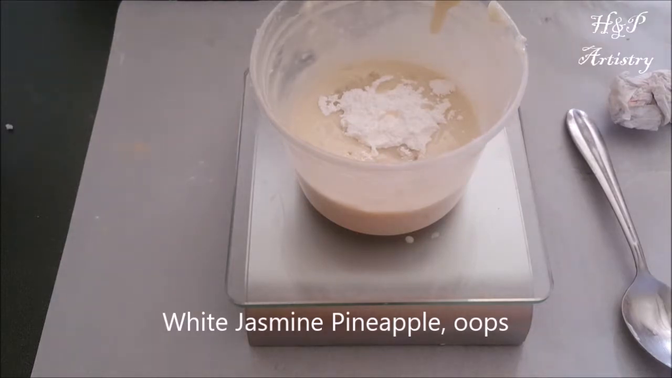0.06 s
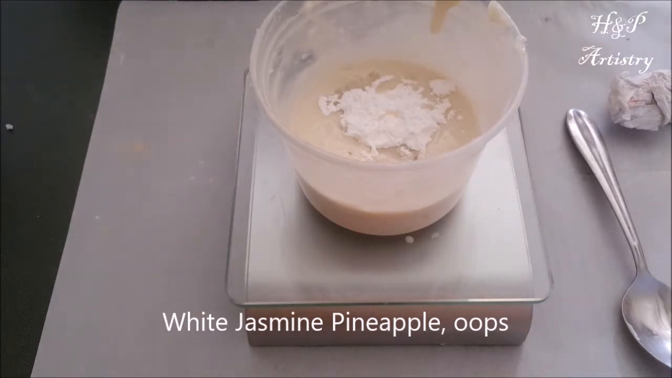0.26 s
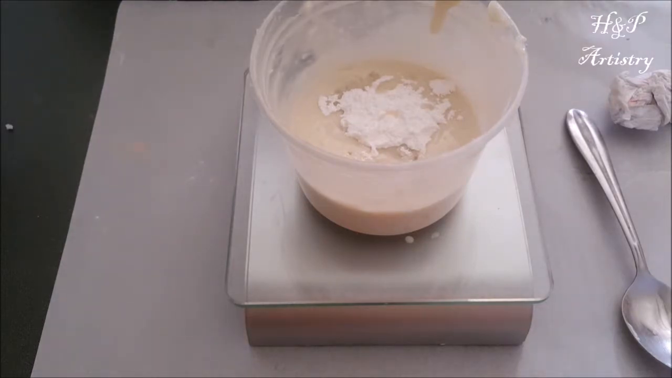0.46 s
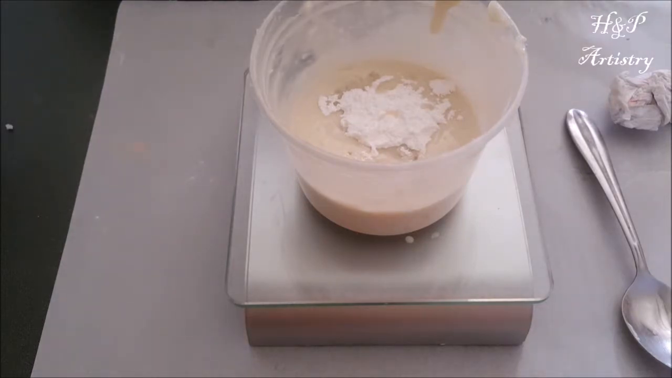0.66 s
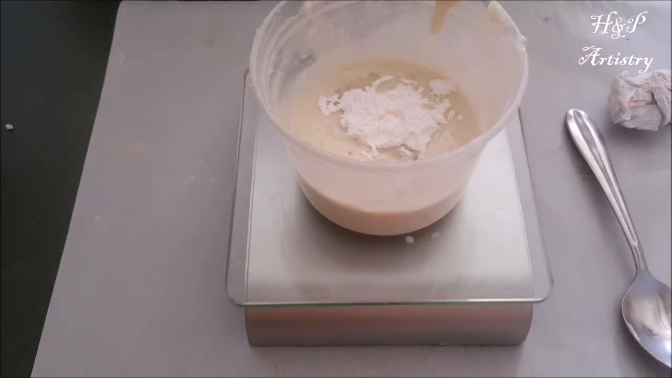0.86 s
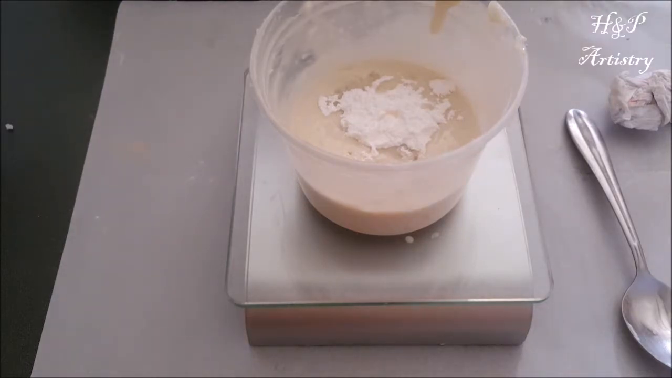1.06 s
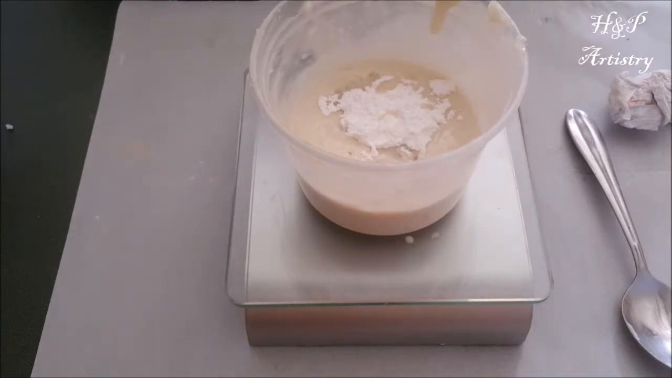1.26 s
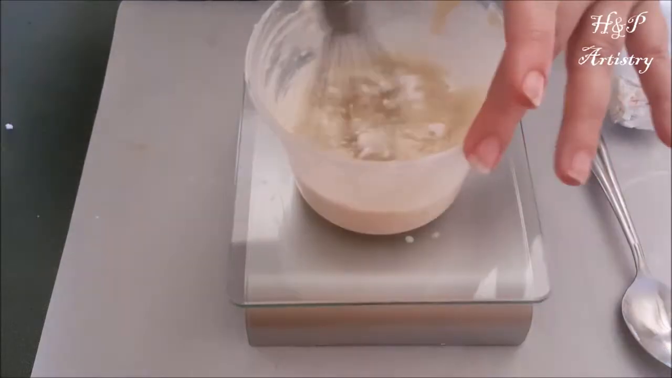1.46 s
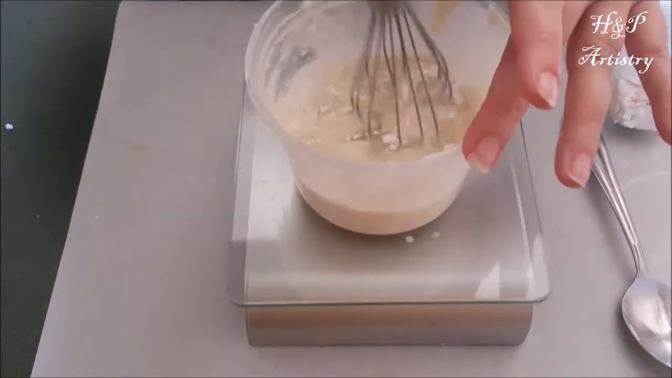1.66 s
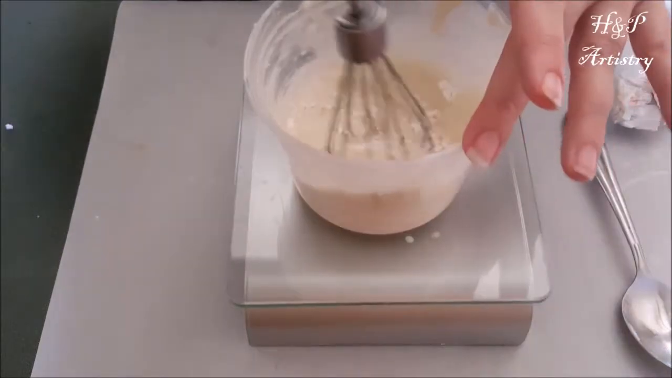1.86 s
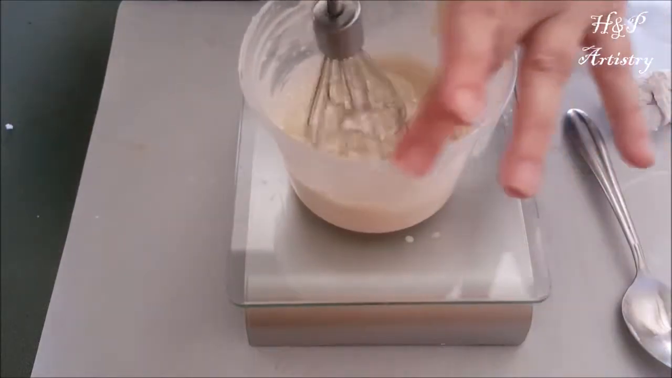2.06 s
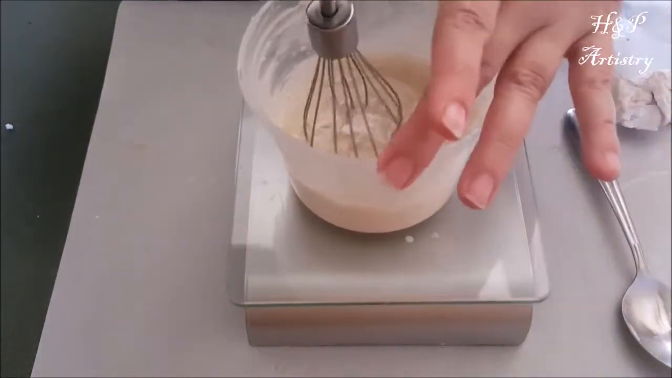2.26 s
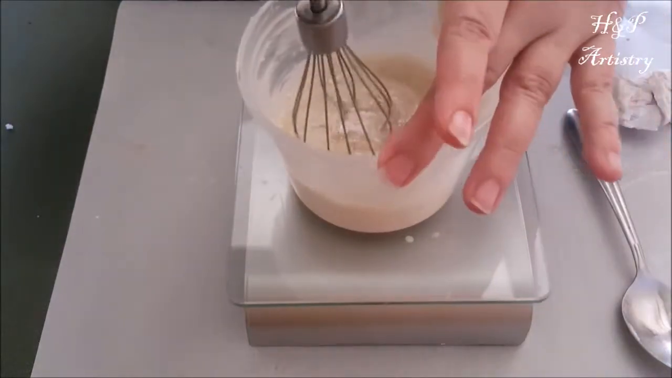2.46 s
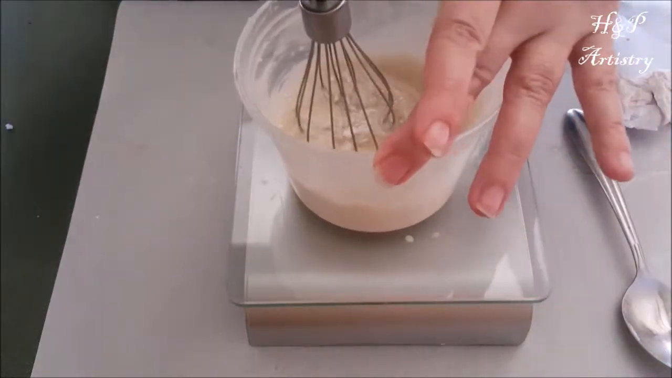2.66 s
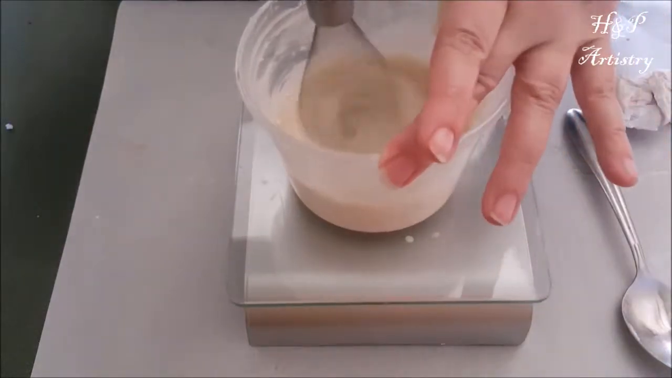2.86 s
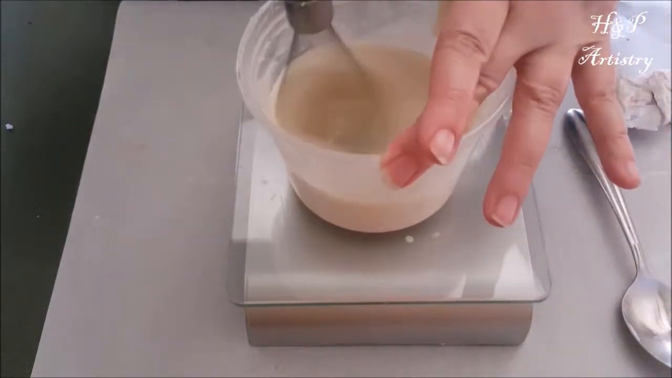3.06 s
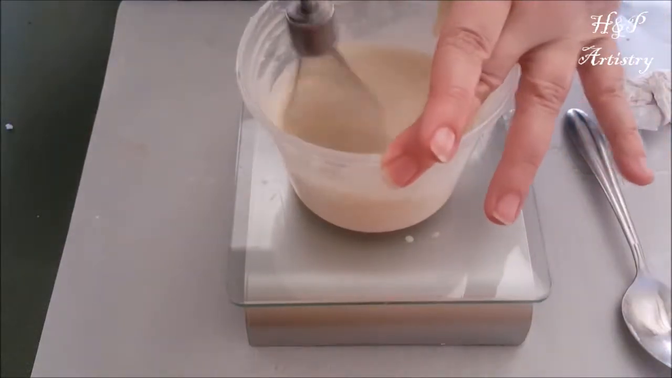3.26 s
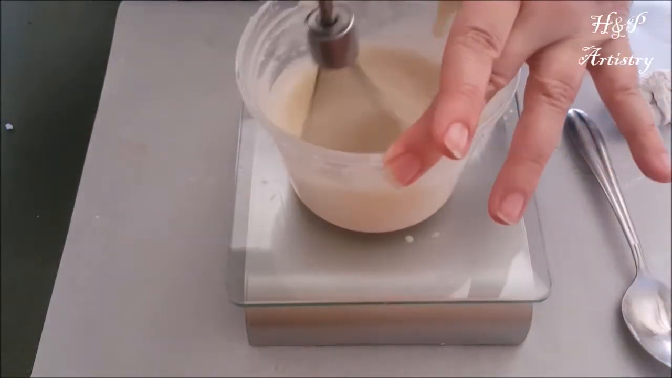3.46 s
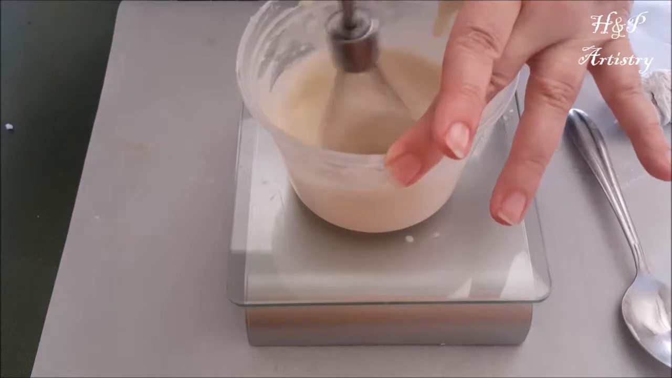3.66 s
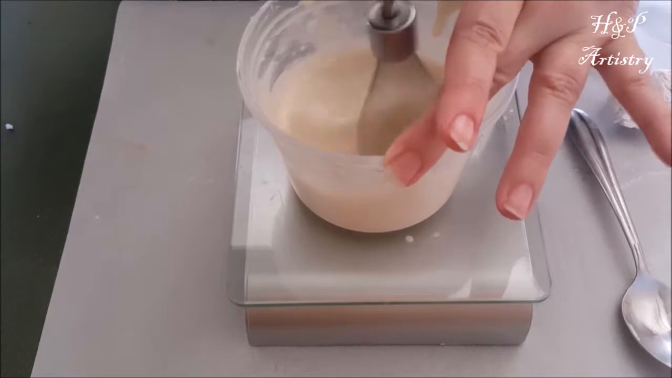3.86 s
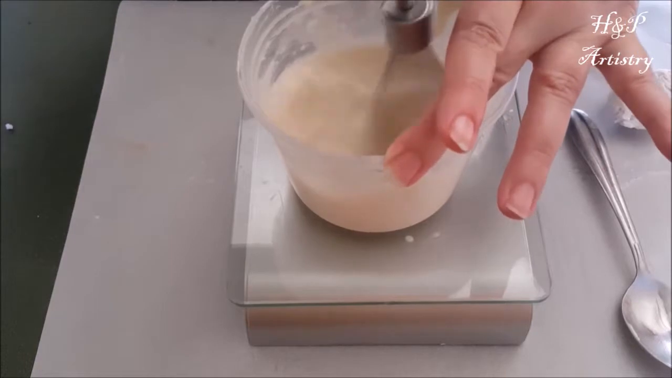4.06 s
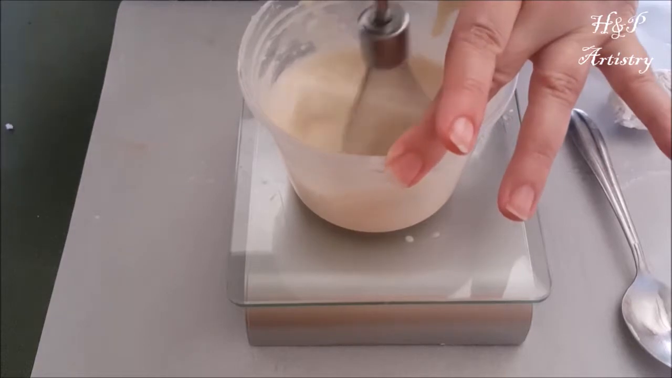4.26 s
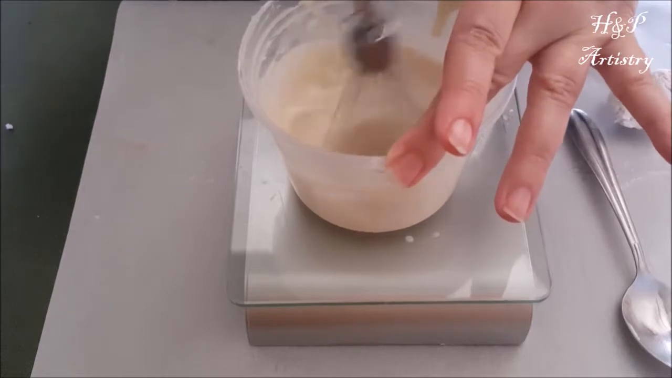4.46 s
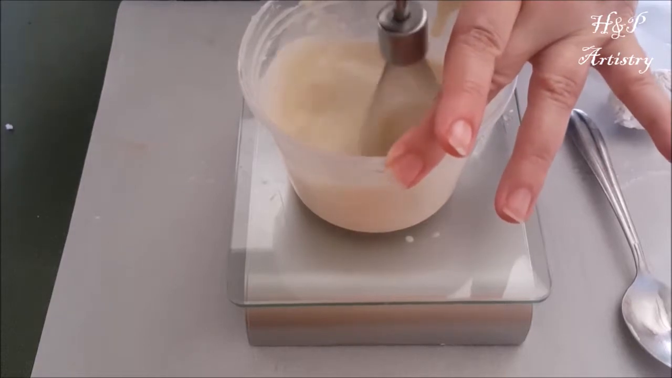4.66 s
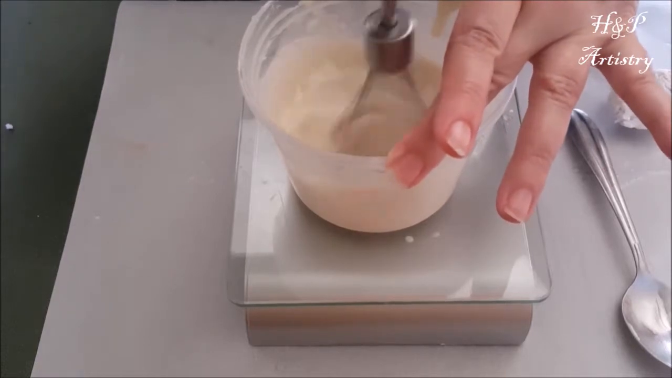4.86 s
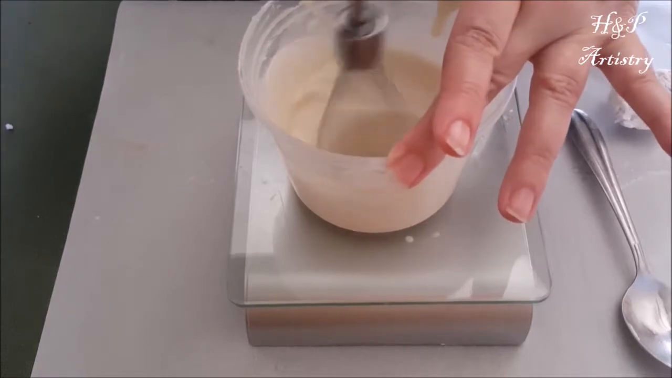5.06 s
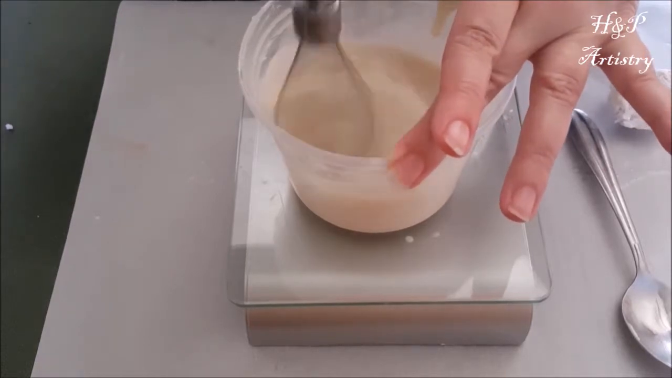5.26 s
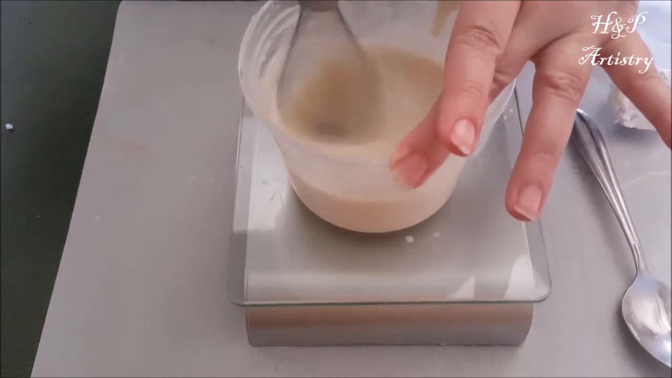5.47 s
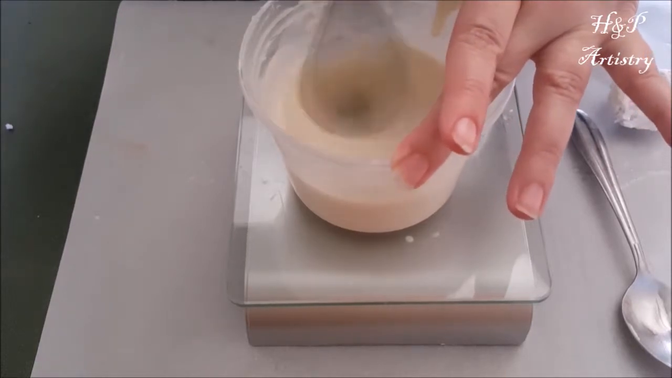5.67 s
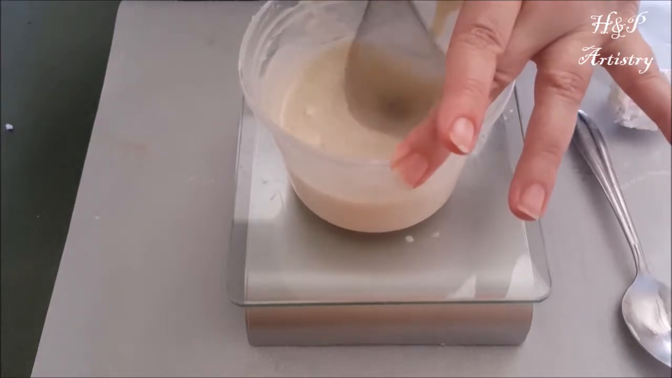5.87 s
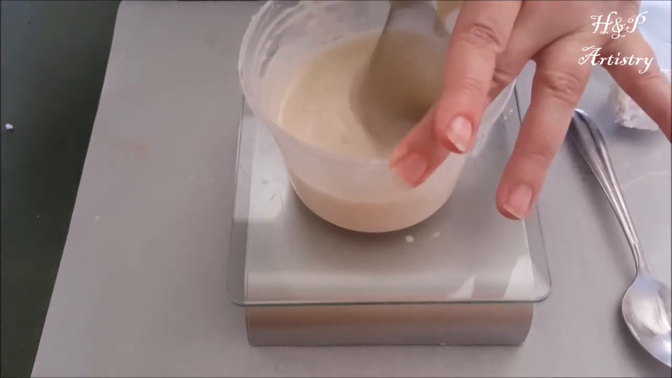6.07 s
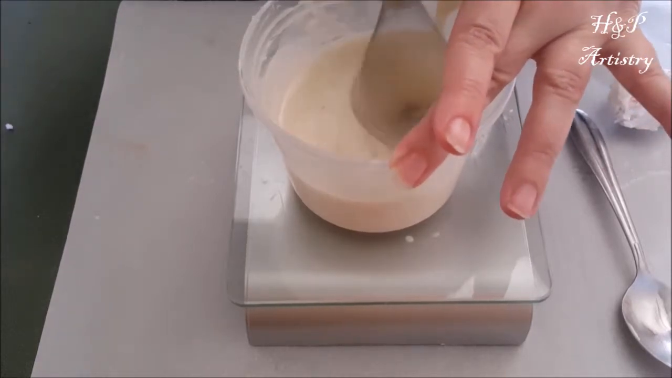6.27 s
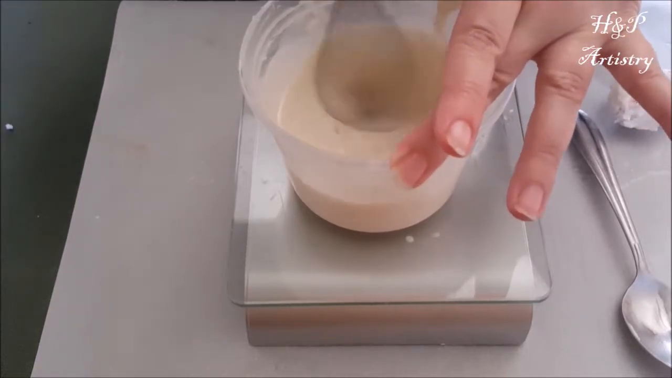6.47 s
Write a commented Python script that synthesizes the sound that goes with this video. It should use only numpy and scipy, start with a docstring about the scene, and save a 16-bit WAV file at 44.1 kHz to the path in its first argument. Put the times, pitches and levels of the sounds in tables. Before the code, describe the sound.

Close stereo microphones pick up the faint hum of a small kitchen, then hollow knocks and wiry ticks as a whisk is lowered into a plastic cup of creamy liquid. A stick blender switches on with a jolt and runs up to speed. Its motor keeps whining, buzzing and hissing over the frothy churn of the liquid, the pitch sagging slightly as the whisk dips deeper.

```python
"""Stick blender in a cup of cream

A small, quiet kitchen with a faint mains hum; a stereo pair close to a plastic cup on a kitchen scale.
A wire whisk is lowered into the creamy liquid, knocking and sliding against the cup. The motor jerks
into motion and runs up: the shaft hums, the gears whine and rattle in the housing, the brushes hiss
and the whisk churns the liquid, whose drag slows the shaft a little as the hand dips deeper."""
import sys
import numpy as np
from scipy import signal
from scipy.fft import rfft, irfft, next_fast_len
from scipy.io import wavfile
from scipy.ndimage import map_coordinates

SR = 44100
rng = np.random.default_rng(int(sys.argv[2]) if len(sys.argv) > 2 else 0)


def wav_out(sig):
    """Save sig, one row per channel (or a flat mono array), as 16-bit PCM at SR to the path in sys.argv[1]."""
    wavfile.write(sys.argv[1], SR, np.round(np.clip(np.atleast_2d(sig).T, -1, 1) * 32767).astype(np.int16))


N = 287267
TIME = np.arange(N) / SR
START_S = 2.78  # switch-on
FREE_HZ, FULL_HZ = 280.2, 270  # shaft turns a second: whisk held high, full working speed


def amp(db):
    """Decibels to gain."""
    return 10 ** (np.asarray(db) / 20)


def unit(x):
    """Scale to rms 1."""
    return x / np.sqrt(np.mean(x ** 2) + 1e-20)


def along(points, hz):
    """Read (f/Hz, value) points on a log frequency axis."""
    f, values = np.transpose(points)
    return np.interp(np.log(hz + 1), np.log(f + 1), values)


def wobble(rate):
    """A smooth random curve, rate knots a second."""
    return map_coordinates(rng.standard_normal(int(N * rate / SR) + 4), [TIME * rate])


def filtered(x, response):
    """Apply a frequency response to x."""
    size = next_fast_len(N + SR // 4)
    return irfft(rfft(x, size) * response(np.fft.rfftfreq(size, 1 / SR)), size)[..., :N]


def after(s, rise_s=0.0039):
    """A gate that opens at s seconds."""
    return np.clip((TIME - s) / rise_s, 0, 1)


def add(track, s, sound):
    """Mix a sound into a track at s seconds."""
    part = track[round(s * SR):][:len(sound)]
    part += sound[:len(part)]


def spread(pair, spectrum):
    """Colour two unrelated signals and blend them for the two microphones; the mid has rms 1."""
    # likeness of left and right: f/Hz, correlation/0-1
    likeness = [(60, 0.77), (130, 1), (290, 0.89), (640, 0.92), (1410, 0.57), (3100, 0.85), (6820, 0.4),
                (15000, 0.074)]

    def response(hz):
        angle = np.arccos(np.clip(along(likeness, hz), 0, 1)) / 2
        return amp(along(spectrum, hz)) * np.array([np.cos(angle), np.sin(angle)])

    mid, side = filtered(pair, response)
    return np.array([mid + side, mid - side]) / np.std(mid)


def rush(spectrum):
    """Stereo noise with a spectrum of f/Hz, relative level/dB."""
    return spread(rng.standard_normal((2, N)), spectrum)


def tone(turns, multiple, rough, flutter_db):
    """One line of the rotating parts, unsteady in phase (rough, radians) and in strength."""
    flutter = amp(flutter_db * wobble(14))
    return np.sqrt(2) * flutter * np.sin(2 * np.pi * multiple * turns + rough * wobble(45))


def ring(modes, t, scatter_db):
    """Damped modes struck softly with random strengths, at rms 1 over the first 15 ms."""
    hz, db, t60 = np.transpose(modes)[:, :, None]
    swing = np.sin(2 * np.pi * hz * t) * (-1) ** np.arange(len(hz))[:, None]
    decay = amp(db + scatter_db * rng.standard_normal(db.shape) - 60 * t / t60)
    attack = 1 - np.exp(-(t / 0.00077) ** 2)
    sound = attack * (decay * swing).sum(0)
    return sound / np.std(sound[t < .015])


def room_tone():
    """Still air all round the microphones and the mains hum of an appliance in the centre."""
    # room air: f/Hz, relative level/dB
    air = [(20, -32), (40, -23), (68, -6), (95, -19), (170, -16.5), (320, -24), (470, -23.5), (800, -31),
           (1200, -27.5), (1700, -21.5), (2600, -28.5), (4200, -39.5), (9000, -42.5), (15800, -39)]
    mains = np.sin(2 * np.pi * 120 * TIME)
    return amp(-68.5) * rush(air) + amp(-66.5 + 0.72 * wobble(5.3)) * mains


def knocks(hollow_hz=590, hollow_t60=0.11):
    """The whisk hits the cup wall with a tick of its wires; blows on the bottom thud through the scale."""
    # whisk on the cup: t/s, thud/dB, wall/dB, relative tick level/dB, hardness/dB per octave
    blows = [(1.507, -34, -38, -52.5, 2.5), (1.791, -38.5, -35.5, -53, 3.2),
             (2.05, -31.5, -31.5, -45.5, -1.5), (2.124, -68, -61, -53.5, 1.5), (2.14, -47, -43, -62, -1),
             (2.171, -54, -55, -76, -3), (2.308, -77, -49, -54, -10), (2.508, -58, -45.5, -60, 2.5),
             (2.534, -52, -43, -50, -5), (2.65, -64, -68, -80, -2), (2.676, -58, -52, -60, -1),
             (2.724, -69, -52, -62, 2)]
    # modes of the cup wall: f/Hz, relative level/dB, t60/s
    wall_modes = [(560, -16, .07), (543, 3, 0.032), (675, -1, 0.028), (964, -6, 0.04), (1203, -2.5, 0.018),
                  (1612, -8.5, 0.027), (2220, -10, 0.015), (2900, -14, 0.011)]
    # modes of the scale under the cup: f/Hz, relative level/dB, t60/s
    scale_modes = [(85, -26, 0.2), (142, -14, 0.12), (275, -1.5, 0.044), (395, 4, 0.031)]
    body, ticks, t = np.zeros(N), np.zeros(N), np.arange(SR // 4) / SR
    for s, thud_db, wall_db, tick_db, tilt_db in blows:
        tilted = [(hz, db + tilt_db * np.log2(hz / wall_modes[0][0]), t60) for hz, db, t60 in wall_modes]
        stretch = 1 + 0.041 * rng.standard_normal()  # the ring depends on where the wires land
        thud = ring(scale_modes, t, scatter_db=1)
        wall = ring(tilted, t * stretch, scatter_db=1.5)
        # the hollow note of the filled cup is most exposed after light taps
        hollow = amp(-28 + 0.4 * wall_db - 60 * t / hollow_t60) * np.sin(2 * np.pi * hollow_hz * t)
        add(body, s + 0.00258, amp(thud_db) * thud + amp(wall_db) * wall + hollow)
        tick_shape = amp(tick_db + 12.5 - 60 * t / 0.024) * (1 - np.exp(-t / 0.0033))
        add(ticks, s + 0.00224, tick_shape * rng.standard_normal(len(t)))
    # colour of the wire ticks: f/Hz, gain/dB
    wires = [(80, -10), (300, -3), (2000, 13.5), (4500, 3.5), (9000, -9.5), (15000, -12)]
    return body + filtered(ticks, lambda hz: amp(along(wires, hz)))


def kitchen(x, delay_s=.005):
    """The short reverberation of nearby walls, different at each microphone."""
    # decay of the room: f/Hz, t60/s
    decay = [(150, 0.11), (600, 0.33), (3000, 0.31), (12000, 0.43)]
    hz, t, noise = signal.stft(rng.standard_normal((2, SR // 2)), SR, nperseg=256)
    tail = signal.istft(noise * amp(-60 * t / along(decay, hz)[:, None]), SR, nperseg=256)[1]
    delayed = np.pad(x, (round(delay_s * SR), 0))
    return signal.fftconvolve(delayed[None], tail / np.linalg.norm(tail[0]), axes=1)[:, :N]


def scrape(fade_db_per_s=42):
    """The wires slide faintly along the wet wall of the cup; each slide rises, holds and fades."""
    # wires sliding on the cup: t/s, length/s, level/dB
    slides = [(2.06, 0.27, -62), (2.67, 0.12, -67)]
    level = sum(after(s, rise_s=.02) * amp(db - fade_db_per_s * np.maximum(TIME - s - length, 0))
                for s, length, db in slides)
    hiss = rush([(300, 9), (2500, 4), (5000, -8), (7000, -8), (8700, -4), (10000, -13), (15000, -11)])
    return level * amp(1.9 * wobble(63)) * hiss * (1 - after(START_S))


def whisk_depth():
    """The hand dips and lifts the whisk."""
    # whisk in the cream: t/s, depth/0-1
    dips = [(3.8, .75), (4, .65), (4.3, .92), (5.05, 1), (5.4, .47), (5.95, 0), (6.51, .32)]
    return np.interp(TIME, *np.transpose(dips))


def shaft_speed(kick_share=.458, kick_s=.0965, creep_s=.346, drag_hz=10.3):
    """Turns a second: a quick kick, then a slow creep to a speed that the drag of the cream lowers."""
    t = np.maximum(TIME - START_S, 0)
    run_up = 1 - kick_share * np.exp(-t / kick_s) - (1 - kick_share) * np.exp(-t / creep_s)
    return (FREE_HZ - drag_hz * whisk_depth()) * np.maximum(run_up, 0)


def strain():
    """Torque of the motor: 1 at rest, 0 when it runs free."""
    return np.clip(1 - shaft_speed() / FREE_HZ, 0, 1)


def gear_force(torque_limit=0.07, friction=0.013):
    """Force that the gears pass on: it follows the strain up to the motor's limit."""
    return np.sqrt(np.minimum(strain(), torque_limit) + friction)


def driven(full_db, power, deep_db):
    """Gain that is full_db at full speed, follows a power of the speed and adds deep_db at full depth."""
    return amp(full_db + deep_db * whisk_depth()) * (shaft_speed() / FULL_HZ) ** power


def jolts():
    """At switch-on the gears slam through their play and ring the housing, too small to radiate bass."""
    # teeth taking up their play: t/s, relative level/dB
    slams = [(2.782, -23), (2.791, -22), (2.799, -17), (2.808, -21), (2.816, -11.5), (2.824, -16.5)]
    # modes of the housing: f/Hz, relative level/dB, t60/s
    housing_modes = [(573, 9, 0.025), (816, -3.5, 0.043), (1176, -2, 0.035), (1658, -11, 0.054),
                     (2041, -5, 0.096), (2590, -16, 0.065), (3040, -12, 0.057), (3530, -22, 0.075)]
    track, t = np.zeros(N), np.arange(SR // 5) / SR
    for s, db in slams:
        crack = 0.24 * amp(-60 * t / .03) * rng.standard_normal(len(t))
        add(track, s, amp(db - 7.5) * (ring(housing_modes, t, scatter_db=2.0) + crack))
    return signal.sosfilt(signal.butter(3, 300, "highpass", fs=SR, output="sos"), track)


def gear_whine(speed, turns):
    """The gear mesh, louder under strain, sweeps up through the resonances of its case."""
    # mesh tone, its sidebands and its octave: multiple of the shaft speed, relative level/dB
    teeth = [(11.53, -3.5), (12, 0), (12.48, -6), (13, -14), (24, -8)]
    # how well the gear case radiates: f/Hz, gain/dB
    gear_case = [(60, -50), (300, -14), (570, 1), (900, -4.5), (1400, -5.5), (1620, 1), (1850, -8),
                 (2120, 1), (2300, -7), (2500, -3.5), (2680, -7), (2800, 2), (2910, 4.5), (3000, -3),
                 (3130, -6), (3250, -18), (3700, -16), (4200, -28), (6250, -19), (6450, -4.5), (6500, -6.5),
                 (6700, -14)]
    force = amp(-19.5) * speed ** 0.19 * gear_force()
    mesh = sum(amp(db) * tone(turns, multiple, rough=0.57, flutter_db=2.9) for multiple, db in teeth)
    slack = np.clip(1 - speed, 0, .5)  # the teeth throb and chatter while the shaft is still slow
    throb = 1 + slack * np.cos(2 * np.pi * turns)
    chatter = 1 + .35 * slack * wobble(500)
    return filtered(force * throb * chatter * mesh, lambda hz: amp(along(gear_case, hz)))


def gear_rattle(turns, stall_db=-34):
    """Loose gears rattle in the housing, pulsing with the shaft and driven by speed and strain."""
    # rattle in the housing: f/Hz, relative level/dB
    spectrum = [(1000, -49), (1700, -19), (1890, -8.5), (2260, 2), (2340, 4.5), (2540, -3), (2790, -5.5),
                (3520, -17.5), (3860, -20.5), (4180, -17.5), (5500, -21), (7150, -73), (12100, -120)]
    pulse = unit((1 + 0.051 * np.cos(2 * np.pi * turns)) * amp(0.64 * wobble(180)))
    level = driven(full_db=-23.5, power=4.45, deep_db=0.9) + amp(stall_db) * strain()
    return level * pulse * rush(spectrum)


def commutator(turns, bump_count=120, pattern_count=3):
    """The brushes run over the same bumps every turn; their pattern changes slowly at an even strength."""
    bumps = rng.standard_normal((pattern_count, bump_count))
    blend = np.array([wobble(2.51) for _ in bumps])
    patterns = np.array([map_coordinates(row, [turns % 1 * bump_count], mode="grid-wrap") for row in bumps])
    return unit((blend * patterns).sum(0) / np.linalg.norm(blend, axis=0))


def brush_hiss(turns, stall_db=-42):
    """The brushes hiss, pulsing with the shaft, and spark as the motor strains from rest."""
    # brushes on the commutator: f/Hz, relative level/dB
    spectrum = [(60, -35), (2650, -9), (4500, -2), (5300, -6.5), (6200, -6.5), (6500, -3.5), (7150, -7.5),
                (8000, -6), (8650, -2.8), (9200, -9.5), (11200, -10), (12200, -10.5), (13100, -9),
                (14500, -11.5), (15800, -11)]
    sheen = np.array([commutator(turns), commutator(turns)])
    pulse = unit((1 + 0.054 * np.cos(2 * np.pi * turns)) * amp(1.1 * wobble(700)))
    level = driven(full_db=-33, power=3.3, deep_db=-0.35) + amp(stall_db) * strain()
    return level * pulse * spread(0.5 * sheen + rng.standard_normal((2, N)), spectrum)


def churn(bubble_count=2400):
    """The wires whip the cream into a froth of noise and short bubbles."""
    # whipped cream: f/Hz, relative level/dB
    spectrum = [(30, -26), (190, -24), (320, -6.5), (482, -8.5), (535, -3.5), (754, -3), (812, -8),
                (950, -8.5), (1070, -3), (1310, -10), (1570, -3.5), (1900, -12), (2470, -7.5), (4180, -120)]
    when, pitch, size, pan = rng.random((bubble_count, 4)).T[:, :, None]
    t = np.arange(SR // 50) / SR
    cycles = 350 * 5 ** pitch * t * (1 + 6 * t)  # each bubble rises in pitch
    pops = amp(32.0 * size - 60 * cycles / 12) * np.sin(2 * np.pi * cycles)
    onsets = START_S * SR + when * (N - START_S * SR)
    samples = (onsets + t * SR).astype(int).ravel()
    mid_side = (pops, pops * (pan - .5))
    bubbles = np.array([unit(np.bincount(samples, part.ravel(), N)[:N]) for part in mid_side])
    froth = spread(0.11 * bubbles + rng.standard_normal((2, N)), spectrum)
    return driven(full_db=-27, power=1.57, deep_db=0.23) * amp(0.82 * wobble(30)) * froth


def slosh():
    """The cream sloshes heavily in the cup, louder with the whisk deep."""
    # moving liquid: f/Hz, relative level/dB
    spectrum = [(20, -37), (50, -21), (75, -10.5), (105, -7.5), (135, 0), (180, -3), (250, -0.5),
                (320, -17), (450, -17), (1500, -120)]
    return driven(full_db=-40, power=2.4, deep_db=3.3) * amp(1.84 * wobble(13)) * rush(spectrum)


def motor_whine(turns):
    """Thin motor lines rise and grow with the speed."""
    # motor lines: multiple of the shaft speed, relative level/dB
    lines = [(10, -34), (10.44, -37.5), (11.1, -45), (15, -47.5), (20, -59), (23, -61), (27, -57),
             (36, -66), (47, -55)]
    whine = sum(amp(db) * tone(turns, multiple, rough=0.69, flutter_db=1.6) for multiple, db in lines)
    return driven(full_db=0.87, power=4.2, deep_db=-1.5) * whine


def shaft_hum(speed, turns):
    """The shaft hums at its turning rate; buzzing overtones grow with speed and gear force."""
    # overtones of the hum: multiple of the shaft speed, relative level/dB
    overtones = [(2, -4), (3, -2.5), (4, -60), (5, -15)]
    hum = driven(full_db=-27, power=7.4, deep_db=5.5) * tone(turns, 1, rough=0.072, flutter_db=0.56)
    buzz = sum(amp(db) * tone(turns, multiple, rough=0.63, flutter_db=2.5) for multiple, db in overtones)
    return hum + amp(-19.5) * speed ** 3.8 * gear_force() * buzz


def blender(lead_s=.00004):
    """All that the shaft drives, heard from close by; it reaches the left microphone slightly earlier."""
    # balance at the microphones: f/Hz, left minus right/dB
    balance = [(50, 4), (110, -2.5), (200, 5.5), (380, 3.5), (700, 0.5), (1290, 2.5), (2380, 0),
               (4400, -6.5), (8120, -1.5), (15000, -1.5)]
    shaft_hz = shaft_speed()
    speed = shaft_hz / FULL_HZ
    turns = np.cumsum(shaft_hz * (1 + 0.000779 * wobble(12))) / SR
    hum = shaft_hum(speed, turns)
    drive = (motor_whine(turns) + gear_whine(speed, turns) + jolts()) * after(START_S)
    noise = gear_rattle(turns) + brush_hiss(turns) + churn() + slosh()
    sound = (hum + noise) * after(START_S) + drive + amp(-3.5) * kitchen(drive)
    sides = np.array([[.5], [-.5]])
    return filtered(sound, lambda hz: amp(sides * along(balance, hz))
                    * np.exp(2j * np.pi * hz * sides * lead_s))


def scene():
    """Knocks a little left of centre, then the running blender, over the quiet room."""
    cup = knocks()
    return cup * amp([[1.3], [-1.3]]) + amp(-6) * kitchen(cup) + scrape() + blender() + room_tone()


def record(dry, top_hz=15800):
    """The microphone chain passes nothing above its band limit."""
    return filtered(dry, lambda hz: hz < top_hz)


dry = scene()
out = record(dry)
wav_out(out)
```